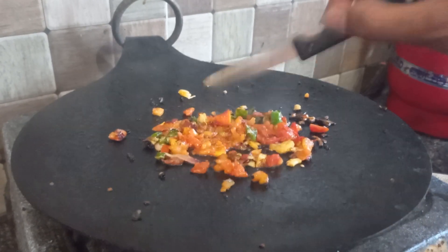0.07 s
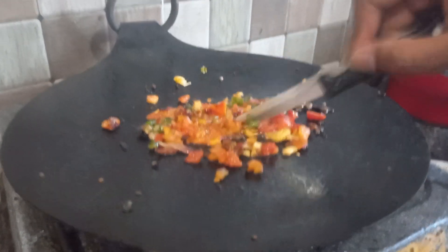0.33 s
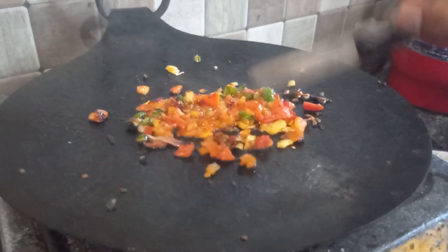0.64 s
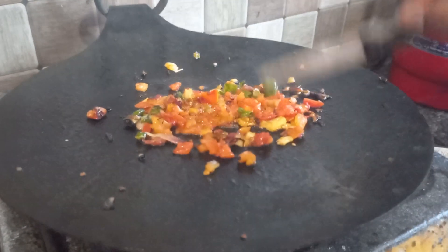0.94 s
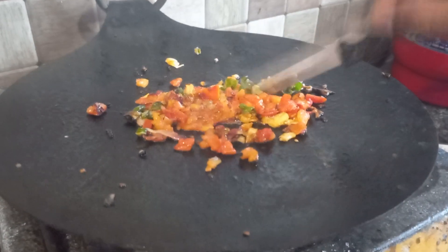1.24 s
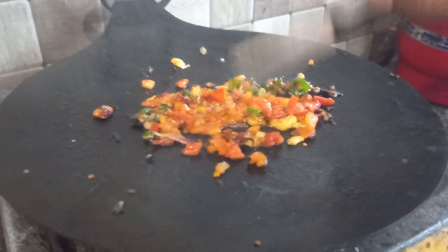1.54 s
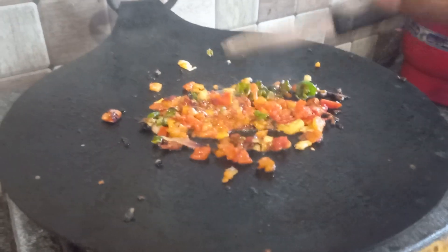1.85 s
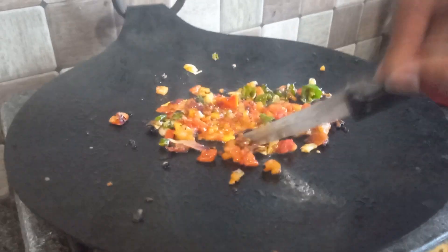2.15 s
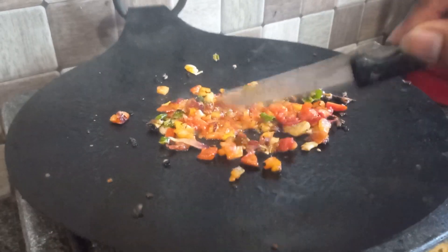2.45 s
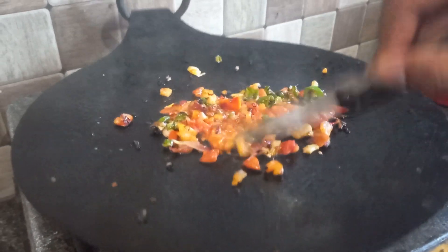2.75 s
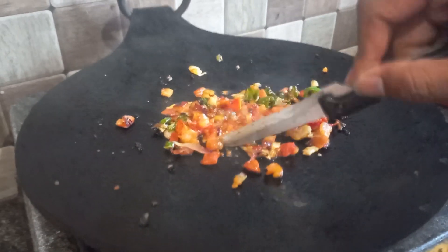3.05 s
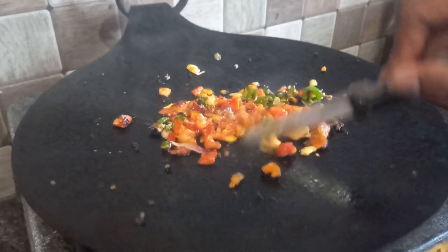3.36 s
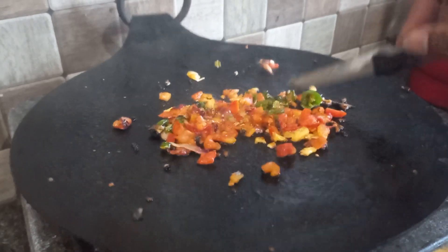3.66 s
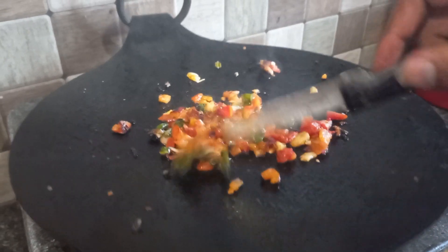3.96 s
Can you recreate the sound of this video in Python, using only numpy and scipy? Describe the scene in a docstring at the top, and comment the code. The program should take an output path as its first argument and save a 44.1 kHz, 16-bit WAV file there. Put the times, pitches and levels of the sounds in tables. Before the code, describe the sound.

A knife chops on an iron griddle close by, several strokes a second, over steady sizzling and a low burner rumble. Ringing clacks and dull knocks fill the first second, then soften while oil spits in tiny ticks. Sharp clacks return from about 1.6 to 2.4 seconds. From 2.5 to 4 seconds, dull thuds and wet vegetable squelches thicken, with more bright clacks around 3 seconds.

```python
"""Chopping on a hot griddle

A tiled kitchen, a stereo pair close to the stove. Chopped vegetables fry on heavy iron over a gas ring.
A steel knife chops at them: where it reaches the iron it clacks and rings; cushioned blows and the
rocking griddle give dull knocks, and wet pieces squelch under the blade, mostly in the second half.
Oil sizzles throughout and now and then spits, over the low rumble of the burner."""
import sys
import numpy as np
from scipy import signal
from scipy.fft import rfft, irfft
from scipy.io import wavfile

SR = 44100
rng = np.random.default_rng(int(sys.argv[2]) if len(sys.argv) > 2 else 0)


def persist_wave(psi):
    """Save psi, clipped to +-1, as 16-bit WAV."""
    counts = np.round(np.clip(psi, -1, 1) * 32767).astype(np.int16)
    wavfile.write(sys.argv[1], SR, np.atleast_2d(counts).T)


N = 176400
AGE = np.arange(SR * 2 // 5) / SR   # time since a blow [s]
CLACK_LOW_HZ, CLACK_TOP_HZ = 1250, 5600

# spectrum of wet vegetables under the blade: (frequency [Hz], relative level [dB])
WET_SPECTRUM = [(700, -14), (1500, 1), (3200, -1), (4500, -7), (6000, -6), (9000, -14), (16000, -14)]
# how alike the two microphones hear the stove: (frequency [Hz], correlation [-1..1])
MIC_LIKENESS = [(30, .4), (80, .95), (130, .97), (250, .94), (450, .85), (700, .7), (1300, .05),
                (2500, -.1), (15000, -.05)]


def knife_taps(ring_db=-23.5, overtone_gap_hz=60):
    """Each tap rings the same steel; the spot and hardness of contact weight each register."""
    # knife on iron, levels before trim: (time [s], clang pitch [Hz], clang [dB], clack [dB], sheen [dB])
    taps = [(.0098, 900, -18.5, -17.5, -19.5), (.185, 960, -20, -25, -41), (.3566, 950, -25, -24.5, -33),
            (.5277, 950, -21, -16.5, -17), (.9015, 880, -24.5, -26.5, -38), (1.097, 880, -31, -45, -52),
            (1.283, 900, -31, -45, -47), (1.441, 900, -42, -49, -55), (1.6076, 920, -20.5, -18, -18.5),
            (1.776, 1000, -27, -26.5, -29.5), (1.9768, 1040, -16, -16, -20.5),
            (2.177, 1080, -17.5, -16.5, -30), (2.3685, 1170, -20, -20, -34), (2.564, 1160, -26.5, -44, -44),
            (2.9325, 1190, -22, -19, -17.5), (3.0842, 1020, -20.5, -17, -16.5),
            (3.3437, 1200, -21.5, -19.5, -21), (3.6515, 1100, -33, -26, -28.5)]
    # ringing of blade and griddle: (frequency [Hz], relative level [dB], t60 [s])
    steel_modes = [(808, -2, .25), (868, 3, .28), (915, -2, .45), (1020, 5, .25), (1190, -3, .2),
                   (1265, -3, .22), (2400, -6, .2), (2900, -1, .3), (3120, -5, .3), (3395, -2, .18),
                   (3570, -3, .2), (4020, -5, .25), (4430, -4, .15), (5070, -8, .18), (6700, -9, .18),
                   (7520, -6, .18), (10950, 0, .16), (11120, -2, .2), (11680, -4, .16), (12505, -5, .18),
                   (13450, -5, .18), (13626, -3, .18), (13750, -3, .13), (14885, -3, .18), (15295, -5, .14)]
    shapes = ((.002, .085, -12, .36, -2.3),     # clang; columns as in blow()
              (.0005, .042, -9.5, .27, -3.8),   # clack
              (.0016, .085, -9.5, .25, -1.5))   # sheen
    out = np.zeros((2, N))
    hz = np.arange(len(AGE) // 2 + 1) * SR / len(AGE)
    mode_bins = (rng.random(len(hz)) < hz[1] / overtone_gap_hz) & (hz > CLACK_LOW_HZ)
    for s, clang_hz, *levels in taps:
        clatter = registers(steel_overtones(mode_bins), clang_hz)
        rings = registers(from_db(ring_db) * ringing(steel_modes, attack_s=.0003), clang_hz)
        steel = sum(map(blow, clatter, shapes, levels, rings))
        add(out, s, steel + griddle_thud(levels[0] - 16))   # the boom follows the clang's strength
    return out


def steel_overtones(mode_bins, mode_share=.62):
    """The steel's many close modes, struck with new strengths, inside a diffuse clatter."""
    # dense overtones of blade and griddle: (frequency [Hz], relative level [dB])
    spectrum = [(500, -12), (700, -13), (830, -3), (1250, 2), (1450, -1), (1620, -5), (1900, 1), (2150, -2),
                (2400, 1), (2650, 0), (2930, 4), (3200, 1), (3600, 2), (3950, -1), (4480, -1), (5000, -8),
                (6900, -10), (7400, -7), (7900, -12), (9400, -13), (10500, -8), (11000, -2), (11600, -6),
                (12100, -4), (13100, -10), (13800, -2), (14300, -7), (15300, -6), (16000, -14)]
    size = (2, len(mode_bins))
    strengths = rng.standard_normal(size) * np.exp(2j * np.pi * rng.random(size))
    modes = at_mics(irfft(mode_bins * strengths, len(AGE)), spectrum)
    return np.sqrt(mode_share) * modes + np.sqrt(1 - mode_share) * noise(spectrum)


def registers(steel, clang_hz, width_hz=520):
    """Split the steel's sound into the blade's clang, the clack and the treble sheen."""
    clang = filtered(steel, [clang_hz - width_hz / 2, clang_hz + width_hz / 2], "band", order=1)
    clack = filtered(steel, [CLACK_LOW_HZ, CLACK_TOP_HZ], "band", order=3)
    sheen = filtered(steel, CLACK_TOP_HZ, "high", order=4)
    return clang, clack, sheen


def dull_knocks():
    """Cushioned blows: a boom, the squash of soft food and a little wet hiss."""
    # knocks, levels before trim: (time [s], thud [dB], squash [dB], wet hiss [dB])
    knocks = [(.271, -32, -35, -40), (.311, -33, -39, -43), (.594, -34, -39, -42), (.66, -35, -46, -46),
              (.849, -33, -35, -41), (.879, -32, -34, -40), (1.097, -39, -42, -50), (1.175, -41, -44, -48),
              (1.283, -39, -43, -50), (1.441, -39, -46, -50), (2.07, -36, -42, -45), (2.407, -33, -37, -42),
              (2.453, -33, -35, -40), (2.636, -28, -28, -36), (2.717, -27, -32, -37),
              (2.773, -22.5, -25, -40), (2.832, -32, -40, -44), (2.863, -25, -27, -38),
              (2.919, -33, -32, -38), (3.124, -36, -36, -40), (3.188, -38, -35, -37),
              (3.262, -25.5, -28, -44), (3.433, -32, -30, -38), (3.502, -26, -30, -40),
              (3.595, -31, -36, -37), (3.723, -29, -26, -36), (3.75, -29, -36, -39), (3.828, -29, -30, -39),
              (3.874, -34, -36, -43), (3.958, -30, -30, -41)]
    # soft food giving way: (frequency [Hz], relative level [dB])
    squash_spectrum = [(100, -40), (200, -20), (380, -4), (500, 1), (620, -4), (780, -2), (1050, -7),
                       (1500, -10), (2200, -20), (5000, -45)]
    squash_shape, hiss_shape = (.003, .07, -11, .35, -4.5), (.004, .09, -7, .3, -6.5)
    out = np.zeros((2, N))
    for s, thud_db, squash_db, hiss_db in knocks:
        thud = griddle_thud(thud_db)
        squash = blow(noise(squash_spectrum), squash_shape, squash_db)
        hiss = blow(noise(WET_SPECTRUM), hiss_shape, hiss_db)
        add(out, s, thud + squash + hiss)
    return out


def griddle_thud(db, modes_db=-4.2):
    """The struck griddle booms: low modes and a burst of dark noise."""
    # low modes of the griddle on its stand: (frequency [Hz], relative level [dB], t60 [s])
    iron_modes = [(118, -17, .2), (232, -1, .14), (254, 0, .24), (288, -8, .12), (400, -14, .12),
                  (512, -7, .14)]
    # noisy part of the boom: (frequency [Hz], relative level [dB])
    spectrum = [(40, -37), (70, -22), (100, -9), (160, -10), (230, -1), (330, -6), (420, -10), (800, -35),
                (2000, -60)]
    shape = (.004, .07, -10, .45, -8)
    ring = at_level(ringing(iron_modes, attack_s=.003), db + modes_db)
    return ring + blow(noise(spectrum), shape, db)


def stirring(flutter_db=2):
    """Wet pieces part and smear under the blade in clumps of small squelches."""
    # the blade pushing through the vegetables: (time [s], level [dB])
    level = [(0, -56), (2.3, -56), (2.58, -48), (2.66, -42), (2.9, -42), (3.05, -47), (3.35, -48),
             (3.48, -44), (3.62, -47), (3.75, -42.5), (3.87, -43), (4, -50)]
    gain = from_db(in_time(level) + flutter_db * drift(rate_hz=20))
    return gain * grains(WET_SPECTRUM, per_s=2200, spread_db=2)


def frying(crackle_db=-6, flutter_db=.9):
    """Countless tiny bursts blur into a hiss; the larger ones stand out as crackle."""
    # sizzling oil: (frequency [Hz], relative level [dB])
    spectrum = [(60, -30), (400, -17), (700, -11), (1500, -2.5), (2500, -2.5), (3800, -1.5), (5000, 1.5),
                (6500, -5.5), (8300, -9.5), (10500, -3), (12500, 0), (15000, 0), (16000, -3)]
    # strength of the hiss: (time [s], level [dB])
    level = [(0, -38.2), (.8, -37.4), (1.4, -37.9), (2, -38.4), (2.6, -39), (3.3, -40.5), (4, -41.5)]
    crackle = from_db(crackle_db) * grains(spectrum, per_s=3000, spread_db=3.8)
    gain = from_db(in_time(level) + flutter_db * drift(rate_hz=25))
    return gain * (noise(spectrum, N) + crackle)


def oil_spits(t60=.003, low_hz=9000, room_db=-26, room_t60=.15):
    """Single droplets burst with a tiny bright tick and a faint tail off the tiles."""
    # bursting droplets: (time [s], peak level [dB])
    spits = [(.717, -15), (1.107, -21), (1.3335, -23), (1.3883, -18), (1.4653, -23), (3.613, -20)]
    out = np.zeros((2, N))
    fall = from_db(-60 * AGE / t60) + from_db(room_db - 60 * AGE / room_t60)
    for s, db in spits:
        tick = filtered(rng.standard_normal((2, len(AGE))) * fall, low_hz, "high")
        add(out, s, from_db(db) * tick / np.abs(tick).max())
    return out


def burner(waver_db=1):
    """Low, wavering rumble of the flame under the iron."""
    # gas flame: (frequency [Hz], relative level [dB])
    spectrum = [(25, -38), (45, -34), (65, -20), (90, 4), (125, -2), (160, -8), (210, -3), (253, 6),
                (300, -6), (400, -14), (520, -10), (650, -18), (880, -12), (1200, -15), (2000, -26),
                (4000, -45)]
    # strength of the rumble: (time [s], level [dB])
    level = [(0, -44.5), (.8, -45), (1.3, -46.5), (1.9, -49), (2.2, -46), (4, -45)]
    return from_db(in_time(level) + waver_db * drift(rate_hz=8)) * noise(spectrum, N)


def blow(carrier, shape, db, ring=0):
    """Quick rise, quick fall, then the kitchen's slower tail; ringing modes keep their own decay."""
    attack_s, t60, room_db, room_t60, trim_db = shape
    rise = 1 - np.exp(-AGE / attack_s)
    fall = np.hypot(from_db(-60 * AGE / t60), from_db(room_db - 60 * AGE / room_t60))
    return at_level((carrier * fall + ring) * rise, db + trim_db)


def ringing(modes, attack_s, scatter_db=4):
    """Decaying sines, struck with new strengths; the higher ones reach the microphones out of step."""
    out = 0
    for hz, db, t60 in modes:
        mic_phase = np.array([[.5], [-.5]]) * np.arccos(at_hz(MIC_LIKENESS, hz))
        phase = rng.uniform(0, 2 * np.pi) + mic_phase * rng.choice([-1, 1])
        fall = from_db(db + scatter_db * rng.normal() - 60 * AGE / t60)
        out = out + fall * np.sin(2 * np.pi * hz * AGE + phase)
    return out * (1 - np.exp(-AGE / attack_s))


def grains(spectrum, per_s, spread_db):
    """Tiny bursts at random moments, most small and a few large; rms 1."""
    sizes = from_db(spread_db * np.minimum(rng.exponential(1, N), 5))
    onsets = rng.random(N) < per_s / SR
    return at_mics(onsets * sizes * rng.standard_normal((2, N)), spectrum)


def noise(spectrum, size=len(AGE)):
    """Stereo noise of a given spectrum."""
    return at_mics(rng.standard_normal((2, size)), spectrum)


def at_mics(pair, spectrum):
    """Give two unrelated noises a spectrum and the microphones' likeness and balance; rms 1."""
    # balance across the microphones: (frequency [Hz], left minus right [dB])
    balance = [(60, 1), (200, 0), (500, 2), (700, 2.5), (1300, 1), (2400, .7), (4500, 3.6), (6000, 0),
               (8000, -6), (10000, -4), (12000, -1), (15000, -1.2)]
    size = pair.shape[1]
    hz = np.arange(size // 2 + 1) * SR / size
    mid, side = rfft(pair)
    alike, sides = at_hz(MIC_LIKENESS, hz), np.array([[1], [-1]])
    left_right = np.sqrt(1 + alike) * mid + sides * np.sqrt(1 - alike) * side
    gain = from_db(at_hz(spectrum, hz) + sides * at_hz(balance, hz) / 2)
    return rms_one(irfft(left_right * gain, size))


def drift(rate_hz):
    """Slow random wander; rms 1."""
    return rms_one(filtered(rng.standard_normal(N + SR), rate_hz, "low")[SR:])


def at_level(x, db, onset_s=.03):
    """Set the rms level of a blow's first moments."""
    return x * from_db(db) / np.sqrt(np.mean(x[:, :int(onset_s * SR)] ** 2) + 1e-20)


def add(track, s, sound):
    """Mix a sound in at a time."""
    start = int(s * SR)
    track[:, start:start + sound.shape[1]] += sound[:, :N - start]


def from_db(db):
    """Decibels to gain."""
    return 10 ** (np.asarray(db) / 20)


def rms_one(x):
    """Scale to unit rms."""
    return x / np.sqrt(np.mean(x ** 2) + 1e-20)


def at_hz(points, hz):
    """Read a table along log frequency."""
    known, values = np.transpose(points)
    return np.interp(np.log(np.maximum(hz, 1)), np.log(known), values)


def in_time(curve):
    """Read a curve at every sample."""
    return np.interp(np.arange(N) / SR, *np.transpose(curve))


def filtered(x, hz, kind, order=2):
    """Butterworth filter."""
    return signal.sosfilt(signal.butter(order, hz, kind, fs=SR, output="sos"), x)


def scene():
    """Everything at the stove, as it reaches the microphones."""
    return knife_taps() + dull_knocks() + stirring() + frying() + oil_spits() + burner()


def record(dry):
    """The microphones' deep bass is rolled off and the top is cut steeply."""
    bass_cut_hz, top_cut_hz = 45, 15900
    top_cut = signal.ellip(12, .1, 80, top_cut_hz, fs=SR, output="sos")
    return signal.sosfilt(top_cut, filtered(dry, bass_cut_hz, "high"))


dry = scene()
out = record(dry)
persist_wave(out)
```